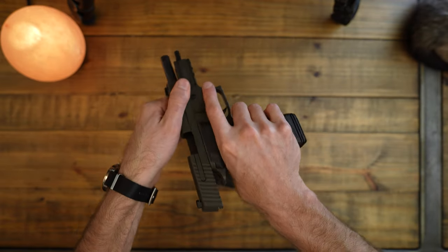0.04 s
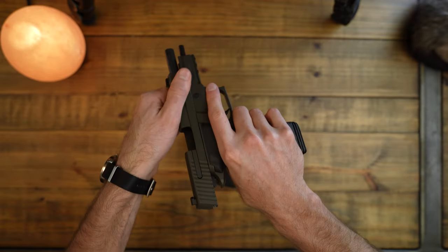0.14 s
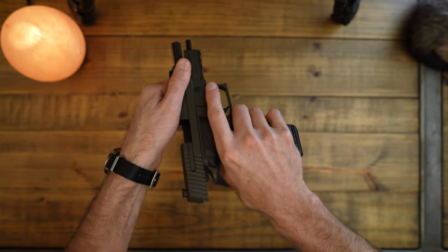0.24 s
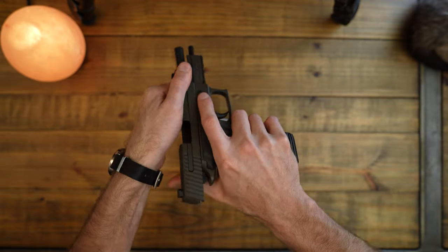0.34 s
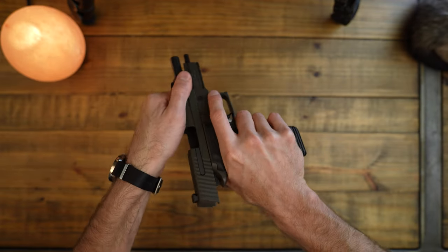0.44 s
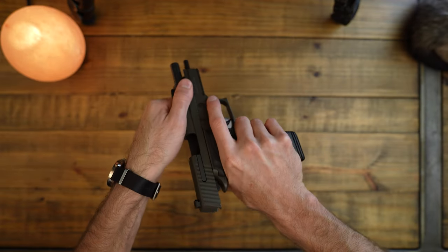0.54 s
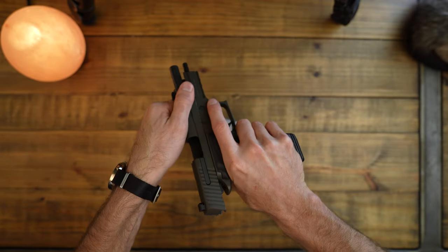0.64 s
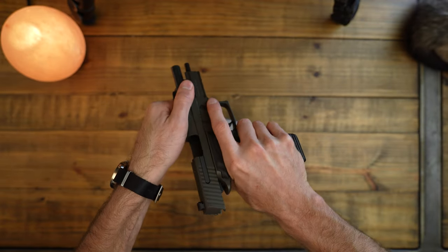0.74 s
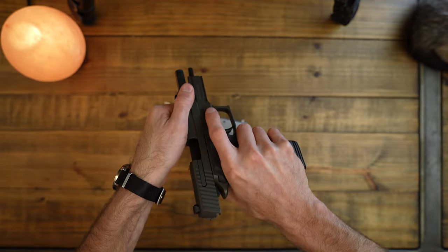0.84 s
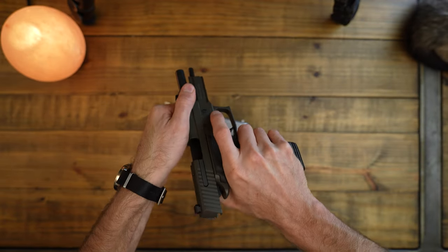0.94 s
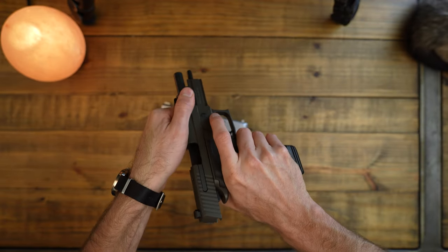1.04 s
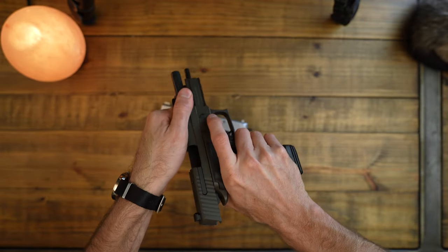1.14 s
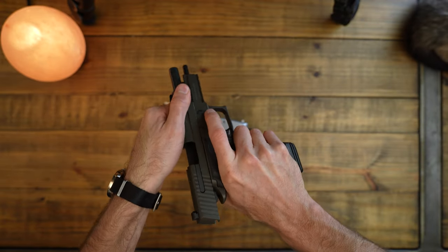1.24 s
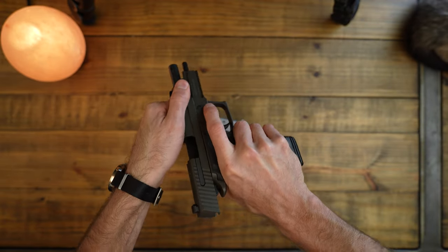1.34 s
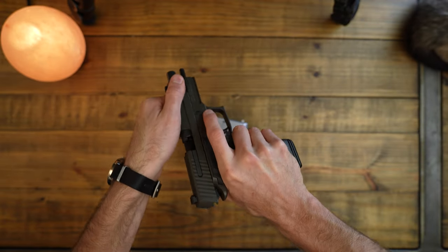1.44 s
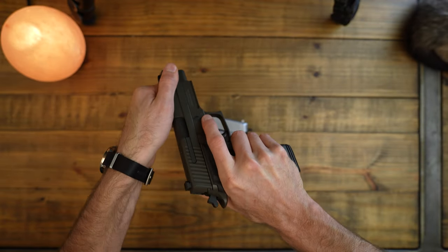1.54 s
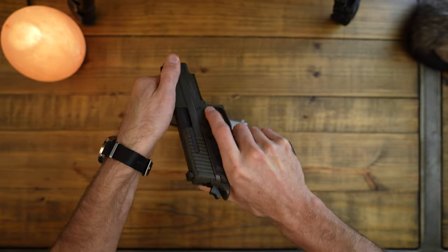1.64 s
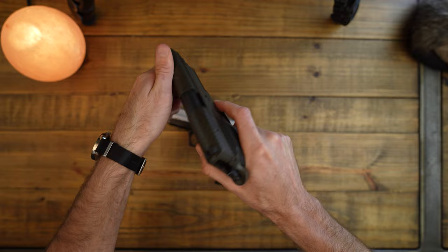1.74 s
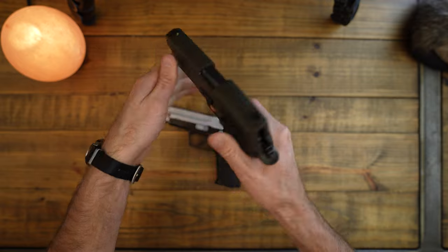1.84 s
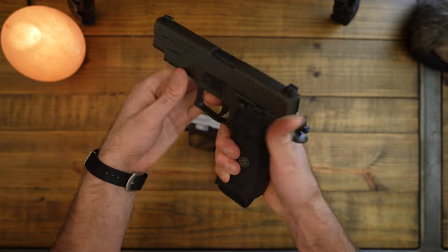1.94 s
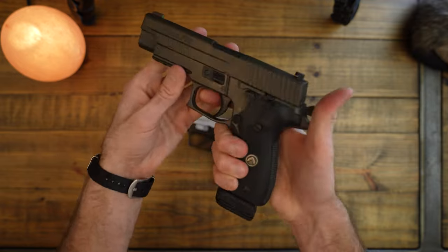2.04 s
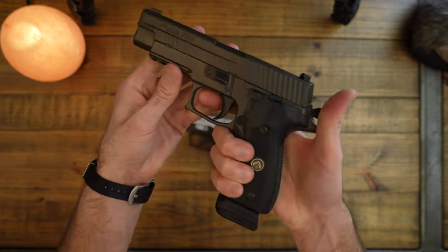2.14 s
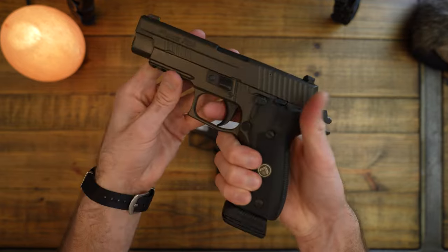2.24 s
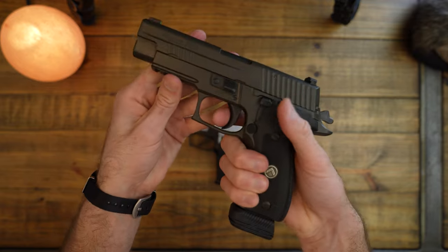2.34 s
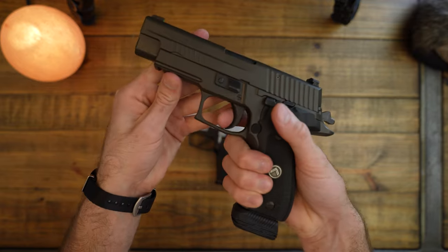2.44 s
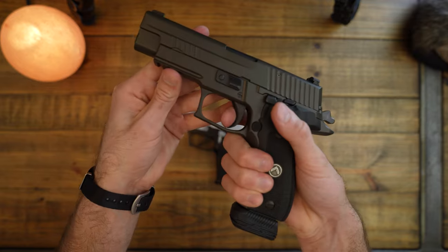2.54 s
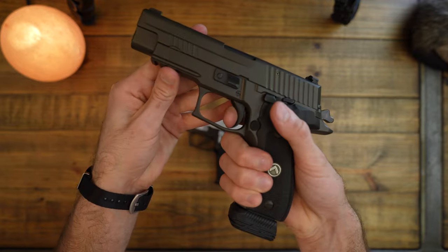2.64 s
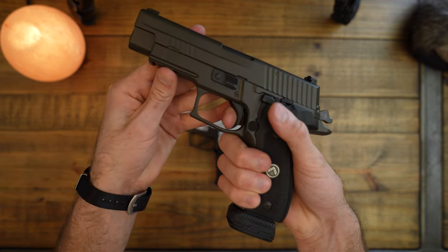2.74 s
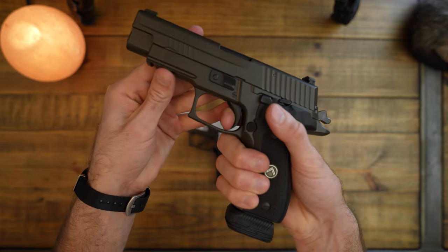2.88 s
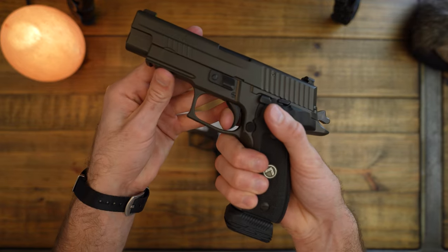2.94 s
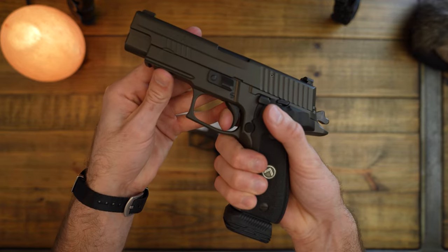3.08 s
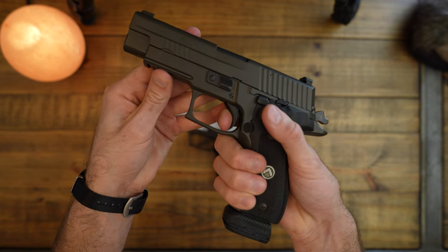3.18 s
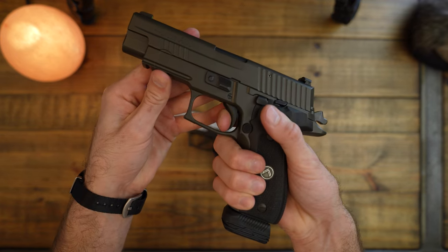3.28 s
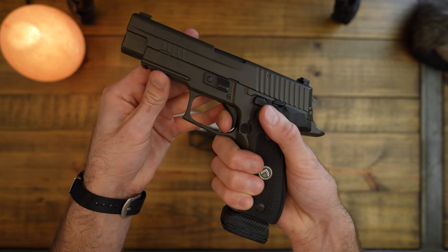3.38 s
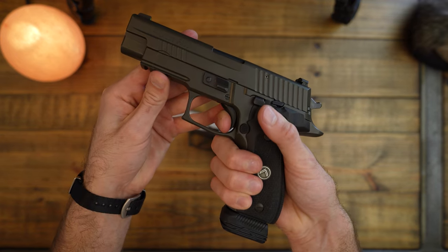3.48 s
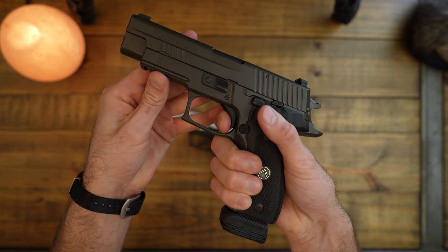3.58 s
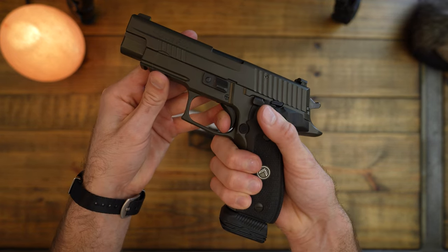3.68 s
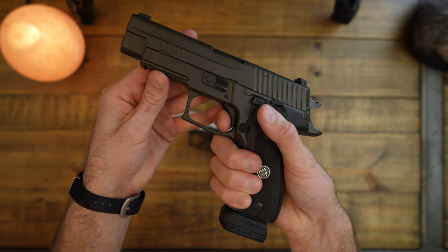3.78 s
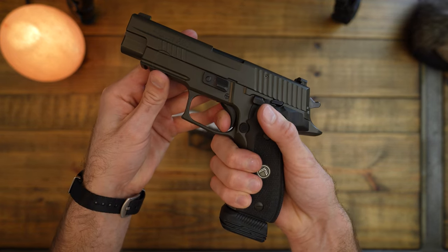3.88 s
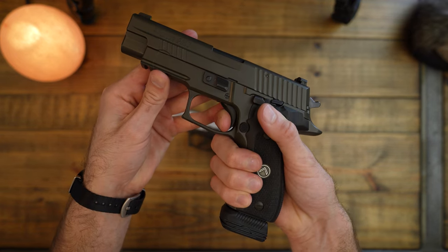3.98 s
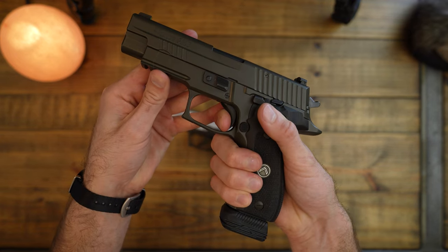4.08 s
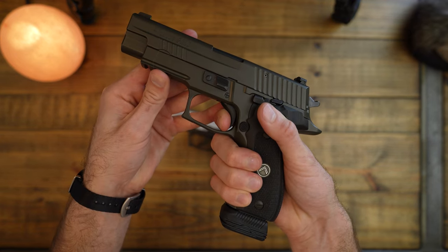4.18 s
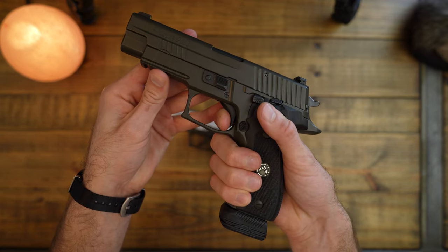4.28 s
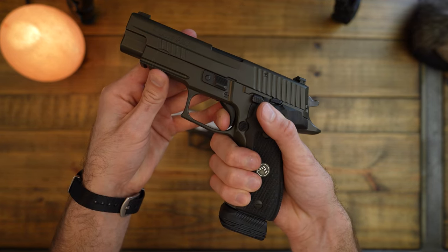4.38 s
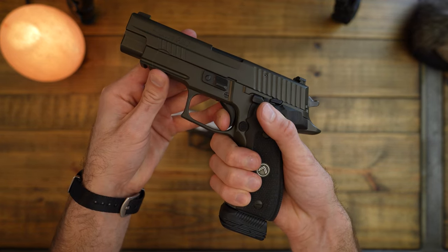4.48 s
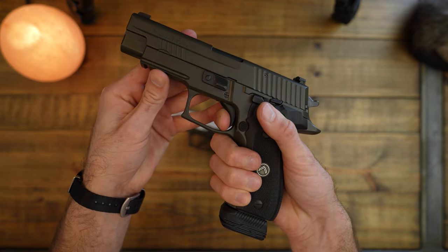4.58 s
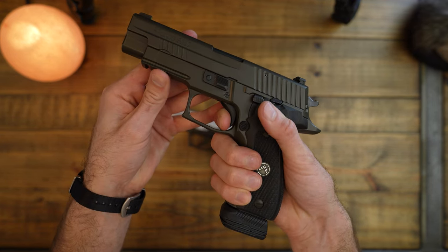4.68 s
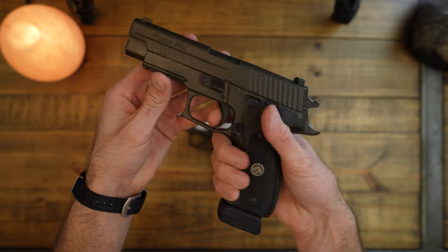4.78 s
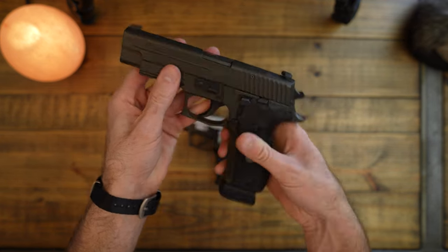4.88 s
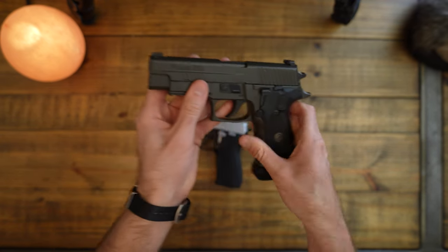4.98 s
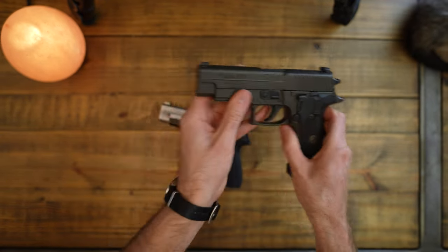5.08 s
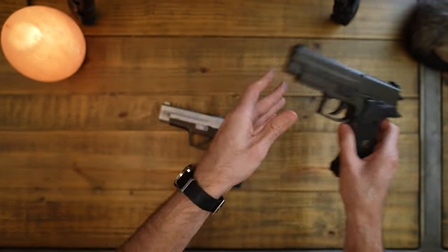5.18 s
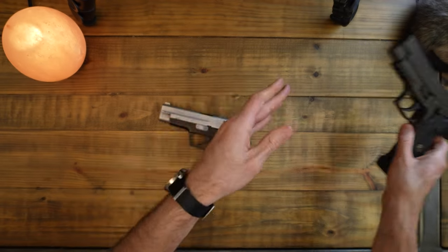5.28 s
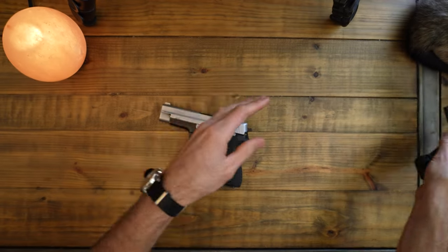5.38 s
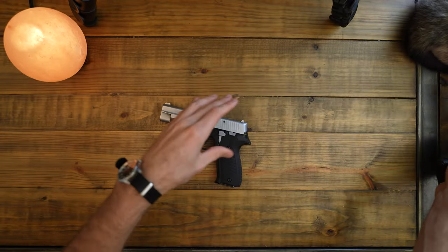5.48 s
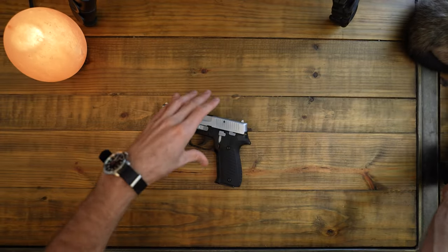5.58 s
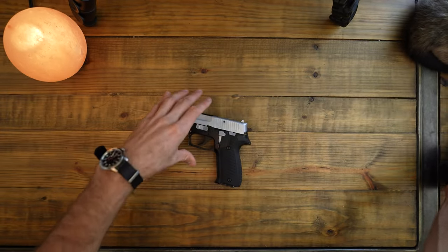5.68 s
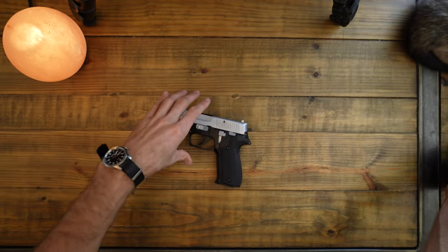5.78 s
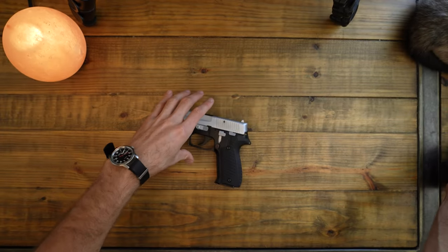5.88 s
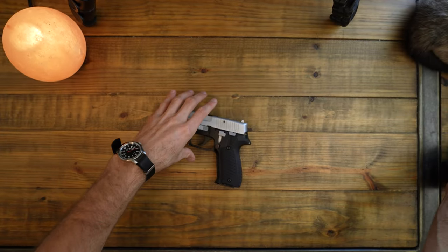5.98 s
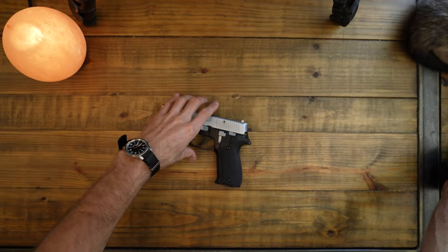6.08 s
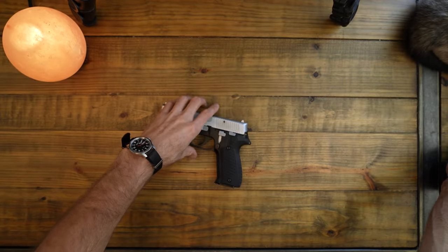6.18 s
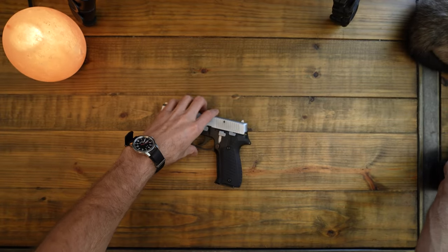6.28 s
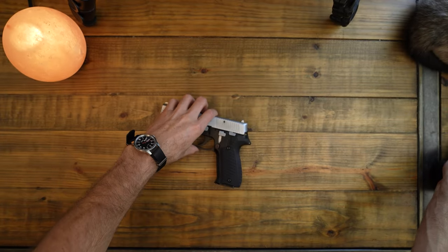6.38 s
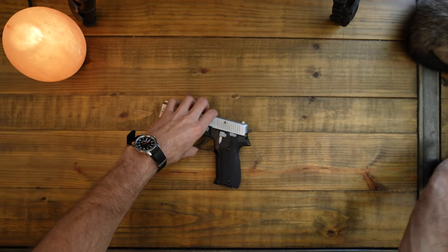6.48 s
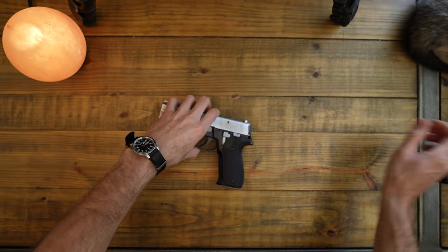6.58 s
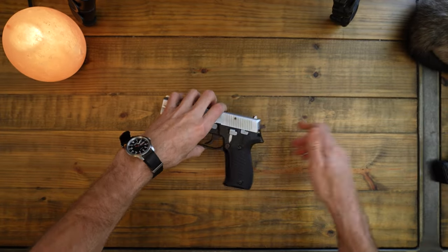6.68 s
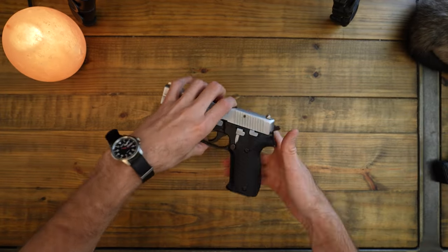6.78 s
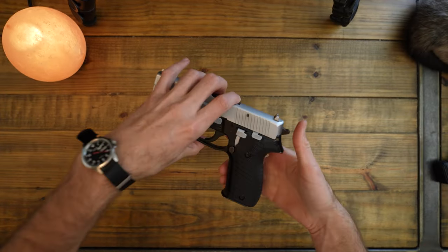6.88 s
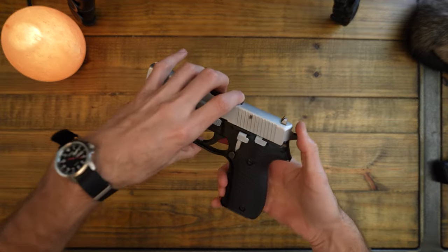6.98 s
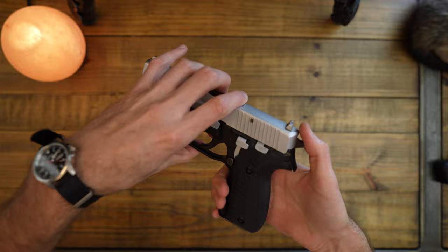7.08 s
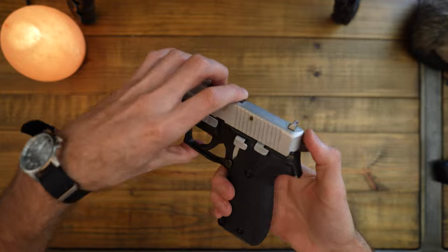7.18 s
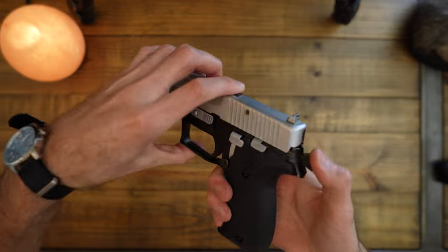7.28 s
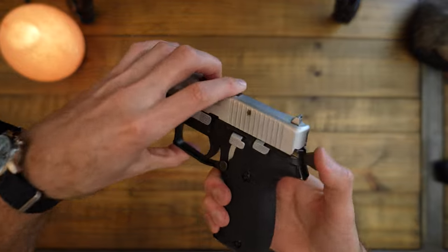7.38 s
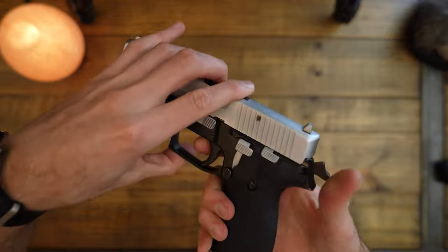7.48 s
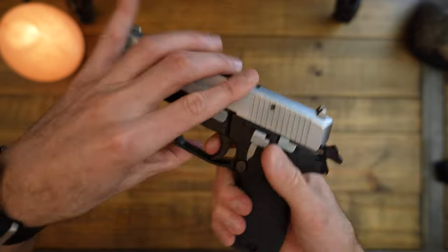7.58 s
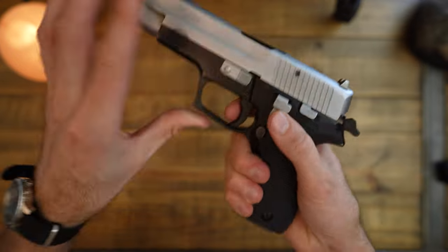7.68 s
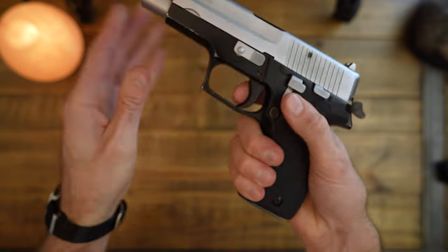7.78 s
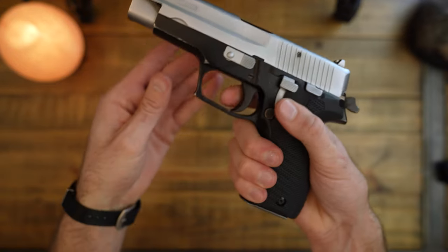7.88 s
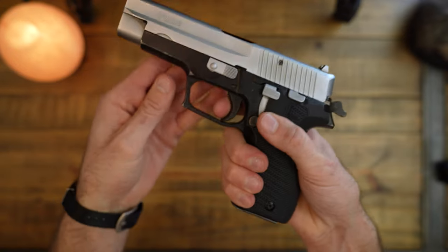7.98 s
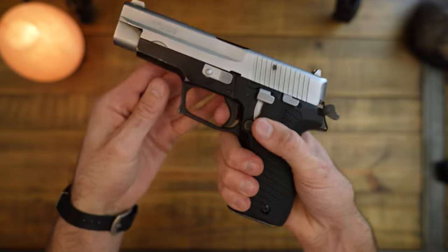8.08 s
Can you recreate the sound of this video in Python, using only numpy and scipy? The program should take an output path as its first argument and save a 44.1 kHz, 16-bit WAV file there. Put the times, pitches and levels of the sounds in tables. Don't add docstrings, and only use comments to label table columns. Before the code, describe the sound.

Steel pistol slide racks with loud ringing clatter, then hammers snap and levers tick over a wooden table in a small quiet room.

```python
import sys
import numpy as np
from scipy import signal
from scipy.fft import rfft, irfft
from scipy.io import wavfile

SR = 44100
rng = np.random.default_rng(int(sys.argv[2]) if len(sys.argv) > 2 else 0)


def voltage_ratio(decibels):
    exponent = np.asarray(decibels, float) / 20
    return 10 ** exponent


def unload_wav(signal):
    wavfile.write(
        sys.argv[1],
        SR,
        np.round(np.clip(np.atleast_2d(signal).T, -1, 1) * 32767).astype(np.int16),
    )


N = 358533


def at_hz(points, hz):
    table_hz, values = np.array(points).T
    return np.interp(np.log(hz + 1), np.log(table_hz), values)


def band(x, low_hz, high_hz):
    return signal.sosfilt(signal.butter(2, [low_hz, high_hz], "band", fs=SR, output="sos"), x)


def ring(force, hz, t60):
    decay, turn = voltage_ratio(-60 / (t60 * SR)), 2 * np.pi * hz / SR
    return signal.lfilter([0, np.sin(turn)], [1, -2 * decay * np.cos(turn), decay * decay], force + 1e-18)


def add(out, piece, s):
    i = round(s * SR)
    out[i:i + len(piece)] += piece[:N - i]


def peak_one(x):
    return x / np.abs(x).max()


def room_tone():
    # pitch in Hz, strength in dB per Hz.
    hush_colour = [(30, -32.5), (45, -13), (130, -5.5), (290, -21), (500, -24.5), (1900, -31.5),
                   (6210, -43.5), (16000, -39.5)]
    # pitch in Hz, width in Hz, level over the hush in dB.
    hum = [(145, 14, 6), (237, 10, 12), (410, 60, 2), (1230, 13, 14), (1320, 34, 8), (1669, 40, 4.5),
           (2110, 40, 2.5), (2345, 5, 6), (3250, 42, 11.5), (3300, 300, 1.5), (12958, 20, 3.5)]
    hz = np.fft.rfftfreq(N, 1 / SR)
    power = 1 + sum(voltage_ratio(db) ** 2 / (1 + (2 * (hz - centre_hz) / width) ** 2) for centre_hz, width, db in hum)
    colour = voltage_ratio(at_hz(hush_colour, hz)) * np.sqrt(power) * (hz > 44)
    hush = irfft(rfft(rng.standard_normal(N)) * colour, N)
    return voltage_ratio(-56) * hush / hush.std()


def hands():
    # start in seconds, length in seconds, level in dB, tilt in dB per octave.
    rubs = [(0, 0.044, -37, -5), (.43, 0.064, -57, -3.5), (.635, 0.017, -47, -3.5), (.875, 0.036, -52, 1),
            (1.687, 0.04, -56.5, 3), (1.78, 0.061, -57, 1), (1.903, 0.025, -64, 0), (1.969, .02, -62.5, 1),
            (1.997, 0.017, -62.5, -4.5), (2.048, 0.051, -62, 1.5), (2.223, 0.028, -71.5, -4),
            (2.305, .045, -61, 4), (2.379, 0.044, -55.5, 3), (4.82, .06, -59, -9),
            (4.99, 0.05, -62.5, -14.5), (5.185, .025, -65, 10.5), (5.937, 0.025, -60, -5),
            (5.95, .035, -55, -8.5), (6.549, .1, -66.5, 2.5), (6.815, 0.058, -58, -3.5),
            (7.1, 0.094, -65.5, -2.5), (7.614, 0.034, -56.5, 3), (7.744, 0.023, -59, 3),
            (7.94, 0.07, -64, -4.5), (8.055, 0.05, -65, 7)]
    grit, out = rng.standard_normal(N) * voltage_ratio(2.5 * rng.standard_normal(N)), np.zeros(N)
    for s, length, level_db, tilt_db in rubs:
        i, n = round(max(s, 0) * SR), round(max(length, .01) * SR + 600)
        hz = np.fft.rfftfreq(n, 1 / SR) + 1
        colour = voltage_ratio(tilt_db * np.log2(hz / 7000)) * hz ** 2 / (hz ** 2 + 1800 ** 2)
        colour *= 1 + .9 / (1 + ((hz - 12600) / 900) ** 2)
        stroke = irfft(rfft(grit[i:i + n], n) * colour, n)
        fade = signal.windows.tukey(n, .5 * (s > 0))
        add(out, voltage_ratio(level_db) * stroke / stroke.std() * fade, max(s, 0))
    return out


def heard(pair):
    direct, diffuse = pair
    return np.array([direct, diffuse * direct.std() / diffuse.std()]) / np.abs(direct).max()


def steel(events, chatter_t60, dull_db, gain_db, ring_db, slide_db):
    # pitch in Hz, level in dB, fade time t60 in seconds.
    slide_modes = [(713, -35.5, 0.24), (1474, -13.5, .025), (2775, -25.5, 0.038), (3290, -27.5, 0.033),
                   (3550, -11.5, 0.11), (3666, -11.5, 0.05), (3835, -12.5, 0.067), (3952, -5.5, .035)]
    length = 3072
    sheen = .48
    grit = rng.standard_normal(N + length) * voltage_ratio(2.22 * rng.standard_normal(N + length))
    strengths = rng.standard_normal(N + length)
    t, out = np.arange(length) / SR, np.zeros((2, N))
    for s, level_db, hz, bright_db in events:
        i = round(s * SR)
        chatter = grit[i:i + length] * np.minimum(t / .0002, 1) * voltage_ratio(-60 * t / max(chatter_t60, .003))
        force = np.array([chatter, t == 0])
        piece = heard(band(force, 2200, 4700))
        piece = piece + voltage_ratio(ring_db) * heard(ring(force, hz, .012)) * [[1], [.4]]
        piece -= voltage_ratio(dull_db) * heard(band(force, 1100, 2000))
        bright = band(force, 6000, 18000) + sheen * band(force, 11000, 14000)
        piece -= voltage_ratio(bright_db + .5) * heard(bright)
        for k, (mode_hz, db, mode_t60) in enumerate(slide_modes):
            piece += voltage_ratio(slide_db + db + 3 * strengths[i + k]) * heard(ring(force, mode_hz, mode_t60))
        add(out[0], voltage_ratio(level_db + gain_db) * piece[0], s)
        add(out[1], voltage_ratio(level_db + gain_db) * piece[1], s)
    return out


def sears():
    # start in seconds, peak in dB, contact ring in Hz, bright part in dB.
    ticks = [(.0161, -18, 5270, -5), (.0288, -25.5, 4220, 4), (.0442, -23, 5090, 2.5),
             (.0479, -20, 3587, 9.5), (.0715, -20.5, 3220, 0.5), (.0772, -22, 3794, 8.5),
             (.8545, -47, 4500, -14), (.865, -27, 5220, 9.5), (1.5728, -12.5, 5120, 3),
             (2.663, -43, 2220, -4.5), (2.7471, -41, 1990, -2.5), (3.4423, -24.5, 3334, 5),
             (3.5042, -12.5, 4900, -2.5), (4.8138, -43, 3333, -1.5), (4.8375, -38, 2960, -13),
             (4.8567, -35, 2840, -4.5), (4.8616, -19, 3370, -2), (5.08, -57.5, 3410, 17.5),
             (7.0057, -50, 3633, -6), (7.2054, -24, 3020, 0), (7.2159, -19, 3920, -9.5),
             (7.2831, -28.5, 4700, -0.5), (7.3174, -23.5, 3255, -5.5), (7.6742, -49.5, 3150, 1.5),
             (7.6949, -44.5, 3600, -1), (8.0554, -32, 3740, 9.5)]
    return steel(ticks, chatter_t60=.019, dull_db=-14.5, gain_db=-3.5, ring_db=-5, slide_db=-19.5)


def pings():
    # start in seconds, pitch in Hz, level in dB, fade time t60 in seconds.
    singing_parts = [(.0485, 13880, -26, .028), (.0995, 13880, -16, .036), (.1685, 13880, -11, .035),
                     (.8652, 5400, -19, .003), (.8672, 4600, -23, .004), (.8655, 11200, -38, .015),
                     (7.4603, 1300, -20, .012), (7.4603, 1800, -19, .01), (4.884, 400, -15, .008),
                     (4.886, 3400, -9, .008), (1.5965, 5900, -12, .007), (7.3175, 3180, -24, .012),
                     (5.847, 3320, -26, .012), (.0956, 727, -27, .08), (.1625, 727, -23, .09),
                     (.1626, 1450, -17, .025), (.3585, 727, -45, .05), (.5005, 727, -33, .06),
                     (1.398, 2500, -52, .07), (1.4455, 420, -34, .015), (1.4465, 727, -29, .05),
                     (1.4466, 1880, -28, .025), (1.5797, 90, -22, .015), (1.597, 1450, -18, .03),
                     (3.4446, 350, -20, .025), (6.2958, 2150, -44, .03), (6.466, 2100, -44, .03),
                     (6.47, 404, -56, 2.4), (7.848, 6200, -46, .01)]
    out = np.zeros(N)
    click = np.eye(1, SR)[0]
    for k, (s, hz, level_db, t60) in enumerate(singing_parts):
        add(out, (-1) ** k * voltage_ratio(level_db) * ring(click, hz, t60), s)
    return out


def slide_rack():
    # start in seconds, peak in dB, contact ring in Hz, bright part in dB.
    contacts = [(.0602, -1.5, 3967, 11.5), (.089, 0, 4982, 16), (.0953, 10.5, 3580, 4),
                (.1004, 6, 3620, -8.5), (.1058, -1, 2775, -8), (.1125, -5, 4020, -8.5),
                (.125, -7, 3808, -5.5), (.1423, -4, 3430, -10), (.1619, 8.5, 3658, 6.5),
                (.1676, -2.5, 3528, -4), (.1827, -8, 3628, -6)]
    return steel(contacts, chatter_t60=.018, dull_db=-13, gain_db=-7.5, ring_db=-15.5, slide_db=-4)


def levers():
    # start in seconds, peak in dB, contact ring in Hz, bright part in dB.
    clicks = [(.3578, -21.5, 1604, -21), (.4999, -13.5, 3780, -13), (.5098, -29.5, 3730, -4),
              (1.0571, -54, 4000, 2), (1.0939, -52.5, 3730, -7), (1.2108, -44, 3340, -11.5),
              (1.3728, -57, 3270, 11), (1.445, -7.5, 3445, 4.5), (1.5408, -22, 3300, -2),
              (1.5462, -17.5, 2750, 0), (1.5898, -6.5, 3340, -13), (1.608, -11.5, 3760, -7),
              (2.6265, -47.5, 3550, -15.5), (6.4658, -35.5, 3360, -9), (6.8098, -45, 2930, -1),
              (7.4684, -22.5, 3440, -2), (7.8479, -38, 4000, 4), (7.9239, -47.5, 3740, -7.5)]
    return steel(clicks, chatter_t60=.028, dull_db=-4.5, gain_db=-4.5, ring_db=-6, slide_db=-14)


def taps():
    # start in seconds, peak in dB, contact ring in Hz, bright part in dB.
    touches = [(.4505, -48, 1815, -1), (.5587, -26, 3550, -11), (1.294, -35, 5295, -6.5),
               (1.3968, -43, 2346, -11), (1.444, -23, 2534, -8.5), (1.7553, -30, 1780, -14.5),
               (1.8608, -44.5, 2800, -7.5), (2.0111, -58.5, 1440, -1.5), (2.0424, -51, 3420, 2),
               (2.1691, -46, 2080, -11), (4.8991, -22.5, 3360, 3), (5.1758, -60, 3250, 15.5),
               (5.8464, -15.5, 3400, -6.5), (6.0318, -51.5, 1780, 1.5), (6.0568, -49, 3480, -15),
               (6.2955, -33.5, 2150, -18), (7.2988, -39, 1730, -9.5), (7.3443, -25, 4600, -1)]
    return steel(touches, chatter_t60=.021, dull_db=1, gain_db=-3.5, ring_db=-4.5, slide_db=-19.5)


def slams():
    # start in seconds, peak in dB, contact ring in Hz, bright part in dB.
    blows = [
        (1.5794, -2, 3670, 13),
        (1.5959, -6, 3290, -1.5),
        (3.4444, 6.5, 4516, 16),
        (3.4528, -1, 3855, 8),
        (3.4572, -5.5, 3613, 10.5),
        (3.4612, -1.5, 3350, 10.5),
        (3.4662, -3.5, 4411, 9.5),
        (3.4778, 0.5, 4230, 5.5),
        (3.4889, -2.5, 4415, -4),
        (3.4952, -3, 2340, -9),
    ]
    return steel(blows, chatter_t60=.023, dull_db=-12.5, gain_db=-4, ring_db=-6, slide_db=-42)


def hammers():
    # start in seconds, peak in dB, contact ring in Hz, bright part in dB.
    falls = [
        (4.8837, -1, 4184, 10),
        (4.893, -9.5, 4380, -0.5),
        (7.3327, -0.5, 5926, 7),
        (7.3376, -8, 3532, -3),
        (7.4601, -10.5, 3520, -9.5),
        (7.5327, -18.5, 3990, -4),
    ]
    return steel(falls, chatter_t60=.018, dull_db=-15, gain_db=-3.5, ring_db=-6.5, slide_db=-31)


def table():
    # start in seconds, peak in dB, centre of the boards struck in Hz,
    # rattle fade time t60 in seconds, rattle level in dB.
    knocks = [(5.8445, -15, 406, 0.28, -1.5), (5.856, -40, 260, 0.042, -18), (5.884, -29, 412, 0.08, -17.5),
              (5.865, -36, 820, 0.048, 14), (5.903, -31, 686, 0.26, -31), (6.145, -46.5, 306, 0.15, -8),
              (6.296, -25, 225, 0.33, -6.5), (6.329, -29.5, 199.3, .08, -14), (6.465, -24.5, 284, 0.24, -7),
              (6.48, -22, 189, 0.12, -19), (6.509, -32, 366, 0.091, -30), (6.571, -32.5, 166, 0.17, -7)]
    # pitch in Hz, level in dB, fade time t60 in seconds.
    board_modes = [(97.7, 7, 0.23), (142.5, -6, 0.1), (231, -1.5, 0.087), (348.5, -7.5, 0.106),
                   (366.6, -8.5, 0.27), (484, -6, 0.057), (550, -8.5, 0.021), (737, -2.5, 0.087),
                   (915, -9, 0.039), (1110, -21.5, 0.013), (1780, -3, 0.067)]
    spread_db = 2.4
    out, t, grit = np.zeros(N), np.arange(SR // 2) / SR, rng.standard_normal(N)
    for s, level_db, centre_hz, rattle_t60, rattle_db in knocks:
        i = round(s * SR)
        boards = np.zeros(len(t))
        for k, (hz, db, t60) in enumerate(board_modes):
            octaves_away = abs(np.log2(hz / centre_hz))
            mode_db = db - 14 * octaves_away + spread_db * grit[i - k]
            boards += voltage_ratio(mode_db) * (-1) ** k * ring(t == 0, hz, t60)
        fading_grit = grit[i:i + len(t)] * voltage_ratio(-60 * t / max(rattle_t60, .005))
        rattle = band(fading_grit, centre_hz * 0.55, centre_hz * 1.66)
        add(out, voltage_ratio(level_db) * (peak_one(boards) + voltage_ratio(rattle_db) * peak_one(rattle)), s)
    return out


def spring():
    # time in seconds, level in dB.
    squeak = [
        (7.06, -77),
        (7.13, -71),
        (7.17, -59.5),
        (7.205, -88.5),
        (7.21, -91),
    ]
    tone = ring(rng.standard_normal(N), 3780, .04)
    level_db = np.interp(np.arange(N) / SR, *np.transpose(squeak), left=-200, right=-200)
    return voltage_ratio(level_db) * tone / tone.std()


def room(x, wet_db, echo_db):
    # pitch in Hz, fade time t60 in seconds.
    fade_times = [(100, .3), (400, 0.14), (1200, .3), (3500, .33), (7000, .3), (10000, 0.26), (12500, 0.27),
                  (15500, .23)]
    # pitch in Hz, level in dB.
    room_colour = [(200, -2.5), (1000, 0.5), (3500, -1.5), (8000, 2), (15000, -8)]
    t, tail = np.arange(SR // 2) / SR, 0
    edges = 60 * 2 ** np.arange(0, 8.3, .5)
    white = rng.standard_normal((2, len(t)))
    for k, (low, high) in enumerate(zip(edges, edges[1:])):
        hz = np.sqrt(low * high)
        fade = voltage_ratio(at_hz(room_colour, hz) - 60 * t / at_hz(fade_times, hz))
        tail = tail + band(white[k % 2], low, high) * fade
    tail = voltage_ratio(wet_db) * tail * np.clip((t - .003) / 0.0058, 0, 1)
    for s, db in [(.0018, -4), (.0046, 7), (.0093, 0), (.0138, -5.5)]:
        tail[round(s * SR)] += voltage_ratio(echo_db + db)
    return signal.fftconvolve(x, tail)[:N]


def scene():
    direct, diffuse = sears() + slide_rack() + levers() + taps() + slams() + hammers()
    soft, sung = hands() + table() + spring(), pings()
    into_room = 0.56 * diffuse + 0.28 * direct + soft + 0.48 * sung
    echoes = room(into_room, wet_db=-34, echo_db=-14.5)
    return (direct + soft + sung + echoes + room_tone())[None]


def top_cut(x):
    return signal.sosfilt(signal.butter(12, 16130, fs=SR, output="sos"), x)


def record(dry):
    mic = signal.sosfilt(signal.butter(6, 50, "high", fs=SR, output="sos"), dry)
    overload = .95
    return top_cut(np.clip(mic, -overload, overload))


dry = scene()
out = record(dry)
unload_wav(out)
```